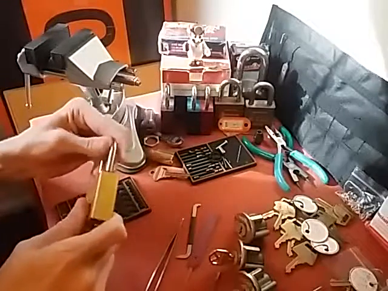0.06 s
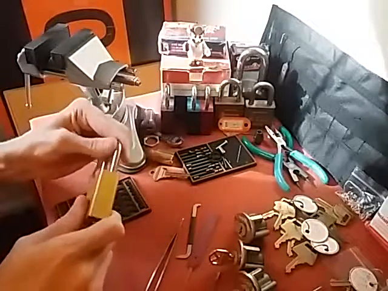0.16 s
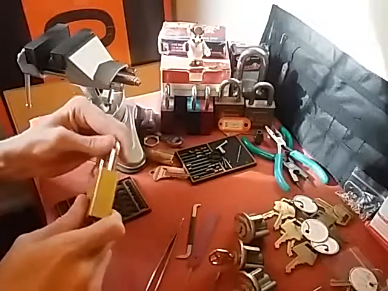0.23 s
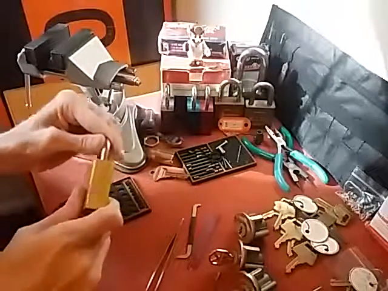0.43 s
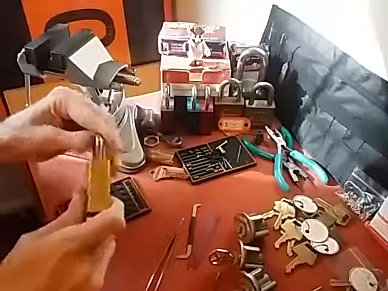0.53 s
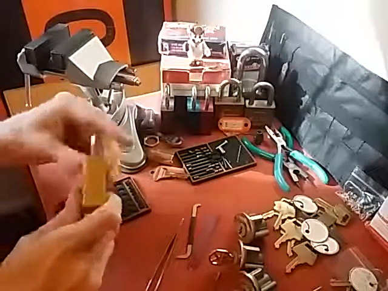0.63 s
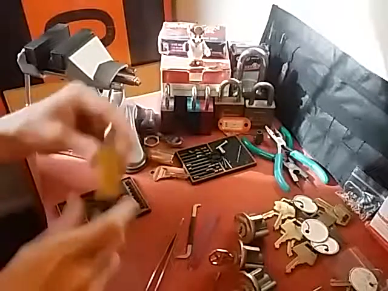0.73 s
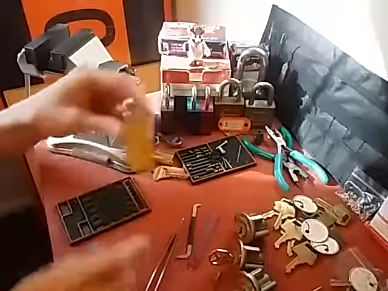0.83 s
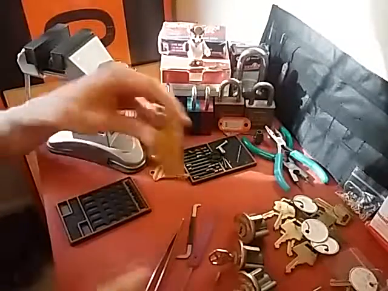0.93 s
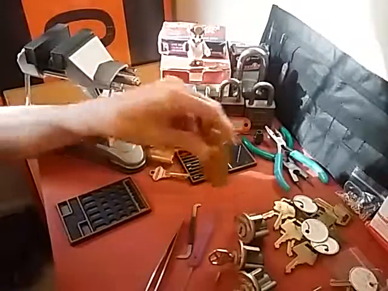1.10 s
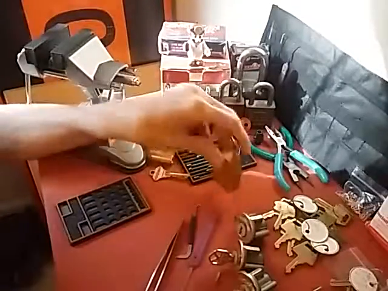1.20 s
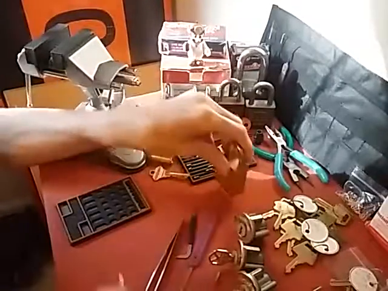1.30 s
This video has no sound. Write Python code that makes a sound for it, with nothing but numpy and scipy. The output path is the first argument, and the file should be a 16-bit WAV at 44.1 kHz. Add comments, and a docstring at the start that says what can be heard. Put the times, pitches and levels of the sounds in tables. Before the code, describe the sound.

A padlock snaps shut with sharp, ringing metal clicks, followed by a few light ticks.

```python
"""A padlock snaps shut

A brass padlock is worked by hand over a workbench in a small room. The latch clicks, the steel shackle
scrapes home and snaps, then clacks as the lock is lifted. Light ticks follow as the fingers shift.
Each click is a sharp crack that sets the metal ringing. The bench and walls echo it, and a noise
suppressor shortens the quiet tails."""
import sys
import numpy as np
from scipy import signal
from scipy.fft import rfft, irfft
from scipy.io import wavfile
from scipy.ndimage import uniform_filter1d

SR = 44100
rng = np.random.default_rng(int(sys.argv[2]) if len(sys.argv) > 2 else 0)


def bounce(signal):
    """Save signal as a 16-bit WAV file at the path given by the first command-line argument."""
    frames = np.transpose(np.atleast_2d(signal))
    limited = np.clip(frames, -1, 1)
    pcm = np.round(limited * 32767).astype(np.int16)
    wavfile.write(sys.argv[1], SR, pcm)


N = 59535

# the room's steady hush: (frequency [Hz], level [dB])
HUSH_COLOUR = [(20, -14.5), (55, -4.5), (150, -2.5), (260, -7.5), (500, -10.5), (1000, -13), (2000, -17),
               (4000, -20), (8000, -26), (15500, -26.5)]
# how alike the noise is in both ears: (frequency [Hz], likeness [0 to 1])
EAR_LIKENESS = [(30, 0.23), (100, 0.1), (500, 0.1), (2000, 0.037)]
# the rise and fall of the hands' rustle: (time [s], level [dB])
RUSTLE_LEVELS = [(0, -96.5), (0.221, -90.5), (.265, -58), (.33, -65), (.42, -67.5), (.54, -60.5),
                 (.63, -85), (0.718, -84), (.77, -62), (.86, -89), (1.06, -80.5), (1.3, -95.5)]
# the rustle's tone: (frequency [Hz], level [dB])
RUSTLE_COLOUR = [(25, -14.5), (60, -5.5), (170, -0.5), (300, -8), (550, -7.5), (900, -13), (3000, -38.5)]
# the time the walls' echo takes to fade by 60 dB: (frequency [Hz], fade [s])
WALL_FADES = [(200, .42), (1200, 0.52), (4500, 0.45), (8000, 0.4), (14000, .41)]
# the tone of that echo: (frequency [Hz], level [dB])
WALL_COLOUR = [(200, -0.5), (800, -3.5), (1500, 3.5), (3000, -1), (5000, -4.5), (8000, 0.5), (14000, 2.5)]
# the lock bumps the hand: (time [s], level [dB])
KNOCK_HITS = [(0.2475, -52.5), (.342, -50), (.3630, -54), (0.749, -56.5), (1.049, -63), (1.141, -63)]
# a bump's dull tone: (frequency [Hz], level [dB])
KNOCK_COLOUR = [(40, -17), (150, -3.5), (260, -4.5), (450, -1), (580, -3), (800, -4.5), (2000, -42.5)]
# the lock shifts in the fingers:
# (time [s], level [dB], treble [dB], chatter fade [s], ping pitch [Hz], ping [dB], left over right [dB])
TICK_HITS = [(0.8625, -57.5, -1.5, .014, 6000, -4, -4), (0.9193, -67, -6, .008, 6900, 2, -5),
             (.9963, -56, 1, 0.0064, 10200, -8.5, -12), (1.0457, -55, -3, .009, 6200, -13.5, -12.5),
             (1.0542, -52, -1.5, .011, 6100, -5, -8.5), (1.063, -48.5, 0, .013, 2950, -6.5, -6.5),
             (1.0686, -47.5, -1.5, .017, 7000, -8.5, -7), (1.0743, -57.5, -4, .025, 2550, -3, -7),
             (1.141, -54.5, 0.5, .025, 11450, -5, -9.5), (1.169, -61.5, -4, .025, 5800, 0, -3.5)]
# a tick's tone: (frequency [Hz], level [dB])
TICK_COLOUR = [(150, -9), (700, -5.5), (1500, -4.5), (2600, 2), (4500, -6.5), (6800, -0.5), (9000, -8.5),
               (11500, -7), (15000, -17)]
# metal hits metal inside the lock: (time [s], level [dB], body [dB], treble [dB], chatter fade [s],
# lock ring [dB], latch ring [dB], left over right [dB])
CLICK_HITS = [(.2446, -46.5, -8.5, -5, 0.0069, -11.5, -20.5, -9.5),
              (.2465, -20.5, -9, -1.5, 0.0076, -13, -5.5, -8.5),
              (0.2491, -24, -10.5, -2.5, 0.003108, -13, -14, -7),
              (0.2605, -33, -7, -10, 0.012, -9.5, -6.5, -5.5),
              (0.3419, -31, -7, -6.5, 0.018, -7, -21.5, -6.5),
              (0.3504, -35, -5, -8.5, 0.010545, -6.5, -21.5, -6),
              (0.3526, -34, -7, 2, .010, -5.5, -22.5, -10), (.3585, -34, -5, -6.5, 0.029, -5.5, -22, -4.5),
              (0.3626, -13, -1, -8, 0.0061, -4.5, -20.5, -9), (.3635, -14.5, 0, 0.5, 0.0087, -2, -21, -5.5),
              (.3660, -20, -2.5, -0.5, .012, -4.5, -22.5, -2),
              (0.3708, -23, 5.5, -4, 0.013666, -2, -22, -4.5),
              (.3810, -30.5, 10, -1.5, 0.012, -8.5, -22, -2), (0.418, -36, -5.5, -6.5, .010, -8, -23, -2.5),
              (.5200, -44.5, 0, -11, .03, -4.5, -20, -11), (.5730, -48, 6.5, -13, 0.011, -9, -22.5, 0),
              (.7330, -54.5, 9.5, -8.5, .010, -3, -31, -8), (0.7478, -36.5, 2, -1.5, .018, -29, -6, -6),
              (0.76, -50, 4, -2.5, .07, -18, -14, -7.5)]
# the tone of a click's crack: (frequency [Hz], level [dB])
CRACK_COLOUR = [(60, -52.5), (200, -43), (330, -32.5), (450, -24.5), (540, -23), (680, -31), (800, -26.5),
                (980, -11.5), (1150, -16.5), (1400, -8.5), (1620, -13), (2350, -7), (3200, -10),
                (4000, -1.5), (5150, 0.5), (5800, -5.5), (6400, -15.5), (7100, -9.5), (8200, -19),
                (9500, -17.5), (12500, -18), (15500, -28.5)]
# the notes that the lock and shackle ring at: (frequency [Hz], level [dB], fade [s])
LOCK_NOTES = [(906.5, -19.5, .1), (1010, -18.5, .04), (1372, -17, .06), (1498, -20, .1), (2347, -15, .13),
              (2780, -14.5, 0.19), (4002, -6, 0.16), (4186, -5.5, 0.063), (4600, -8, 0.13),
              (4700, -4.5, .15), (4874, -4.5, .15), (5040, -1.5, .16), (5100, 0, 0.15), (5380, -0.5, 0.14),
              (5527, -4, .25), (5960, -6.5, 0.26)]
# the notes of the small sprung latch: (frequency [Hz], level [dB], fade [s])
LATCH_NOTES = [(2900, -5, 0.033), (3774, -6, .06), (4960, 1, .15), (6780, 2, .012), (9060, -5, .012),
               (11250, -11.5, .05)]

BODY_HZ, TREBLE_HZ = 1760, 7100  # "body" lies below the first, "treble" above the second


def amp(db):
    """Turn decibels into a gain."""
    return 10 ** (np.asarray(db) / 20)


def along(points, hz):
    """Read between a table's points, on a log frequency scale."""
    freqs, values = np.transpose(points)
    return np.interp(np.log(hz + 1), np.log(freqs + 1), values)


def sides(pan_db):
    """Left and right gains; above 0 dB leans left."""
    return amp(np.array([[pan_db / 2], [-pan_db / 2]]))


def normed(x):
    """Scale each channel to an energy of 1."""
    return x / np.linalg.norm(x, axis=-1, keepdims=True)


def add(track, s, sound):
    """Mix a sound in, s seconds from the start."""
    part = track[:, round(s * SR):][:, :sound.shape[1]]
    part += sound[:, :part.shape[1]]


def causal(gain):
    """A filter with these gains that rings only after the hit, never before."""
    cepstrum = irfft(np.log(np.maximum(gain, 1e-6)))
    half = len(cepstrum) // 2
    cepstrum[1:half] *= 2
    cepstrum[half + 1:] = 0
    return np.exp(rfft(cepstrum))


def noise(colour):
    """Stereo noise of strength 1, partly alike in both ears in the bass."""
    hz = np.fft.rfftfreq(2 * N, 1 / SR)
    turn = np.arccos(np.clip(along(EAR_LIKENESS, hz), -1, 1)) / 2
    spectrum = rfft(rng.standard_normal((2, 2 * N))) * amp(along(colour, hz))
    mid, side = irfft(spectrum * [np.cos(turn), np.sin(turn)])[:, :N]
    pair = np.array([mid + side, mid - side])
    return pair / pair.std()


def room_hush(level_db=-61.5):
    """The room's faint, steady background noise."""
    return amp(level_db) * noise(HUSH_COLOUR)


def hands():
    """Skin and sleeves rustle dully while the lock is pressed and lifted."""
    db = np.interp(np.arange(N) / SR, *np.transpose(RUSTLE_LEVELS))
    return amp(db) * noise(RUSTLE_COLOUR)


def wall_echo(x, level_db=-8.5, delay_s=.006, pan_db=-3):
    """The walls smear the right channel into a tail; each frequency fades at its own speed."""
    hz, t, spectrum = signal.stft(rng.standard_normal((2, SR * 3 // 4)), SR, nperseg=256)
    db = along(WALL_COLOUR, hz)[:, None] - 60 * t / along(WALL_FADES, hz)[:, None]
    tail = normed(signal.istft(spectrum * amp(db), SR, nperseg=256)[1])
    tail = np.pad(tail, ((0, 0), (int(delay_s * SR), 0)))
    return amp(level_db) * sides(pan_db) * signal.fftconvolve(x[1:], tail, axes=1)[:, :N]


def bench_echo(x, level_db=-8, fade_s=.043, delay_s=.0028):
    """Sound bounces quickly off the bench and the things on it."""
    t = np.arange(SR // 8) / SR
    echo = normed(rng.standard_normal((2, len(t))) * amp(-60 * t / fade_s) * (t > delay_s))
    return amp(level_db) * signal.fftconvolve(x, echo, axes=1)[:, :N]


def contact(colour, fade_s, body_db=0, treble_db=0, smooth_hz=900, size=4096):
    """Two things meet: a sharp first touch, then chatter that quickly dies."""
    t, hz = np.arange(size) / SR, np.fft.rfftfreq(size, 1 / SR)
    burst = rng.standard_normal((2, size)) * amp(-60 * t / fade_s)
    burst[:, 0] = 2.0308  # the first touch
    spectrum = rfft(burst)
    # even out chance peaks before shaping the tone
    power = uniform_filter1d(np.abs(spectrum) ** 2, int(smooth_hz / hz[1]))
    spectrum *= [causal(np.abs(channel) ** -.5) for channel in power]
    body = body_db / (1 + (hz / BODY_HZ) ** 4)
    treble = treble_db * (1 - 1 / (1 + (hz / TREBLE_HZ) ** 6))
    return normed(irfft(spectrum * causal(amp(along(colour, hz) + body + treble))))


def ring(notes, body_db=0, scatter_db=-.5, drift=.035):
    """Struck metal rings a little differently each time; loose parts make its notes waver."""
    t = np.arange(SR // 2) / SR
    hz, db, fade_s = np.transpose(notes)[:, :, None]
    db = db + body_db * (hz < BODY_HZ) + scatter_db * rng.standard_normal(hz.shape)
    wander = np.cumsum(drift * rng.standard_normal((len(hz), len(t))), axis=1) * np.sqrt(hz / BODY_HZ)
    ear_shift = np.array([0, np.pi / 2])[:, None, None]
    phase = rng.uniform(0, 2 * np.pi, hz.shape) + wander + ear_shift
    waves = amp(db - 60 * t / fade_s) * np.sin(2 * np.pi * hz * t + phase)
    return normed(waves.sum(1))


def padlock(ring_trim_db=-6.5, ping_fade_s=.012, knock_fade_s=.075):
    """Clicks set the lock and latch ringing, light ticks ping, and the lock knocks against the hand."""
    out = np.zeros((2, N))
    for s, db, body_db, treble_db, fade_s, ring_db, latch_db, pan_db in CLICK_HITS:
        gain = amp(db) * sides(pan_db)
        lock = amp(ring_trim_db + ring_db) * ring(LOCK_NOTES, body_db)
        latch = amp(latch_db) * ring(LATCH_NOTES)
        add(out, s, gain * contact(CRACK_COLOUR, fade_s, body_db, treble_db))
        add(out, s, gain * (lock + latch))
    for s, db, treble_db, fade_s, ping_hz, ping_db, pan_db in TICK_HITS:
        gain = amp(db) * sides(pan_db)
        add(out, s, gain * contact(TICK_COLOUR, fade_s, treble_db=treble_db))
        add(out, s, gain * amp(ping_db) * ring([(ping_hz, 0, ping_fade_s)]))
    for s, db in KNOCK_HITS:
        add(out, s, amp(db) * contact(KNOCK_COLOUR, knock_fade_s)[:1])  # same in both ears
    return np.sqrt(SR * .002) * out  # levels count a hit's energy as if packed into 2 ms


def scene():
    """The lock, its echoes, the hands and the room's hush."""
    lock = padlock()
    return lock + bench_echo(lock) + wall_echo(lock) + hands() + room_hush()


def suppress_noise(x, threshold_db=11, depth_db=9.5, softness_db=4.5):
    """Turn each frequency band down while it stays near its own quiet level."""
    spectrum = signal.stft(x, nperseg=256)[2]
    power = (np.abs(spectrum) ** 2).mean(0)
    power = uniform_filter1d(power, size=25, axis=0)  # smooth over frequency
    power = uniform_filter1d(power, size=3, axis=1)  # and over time
    db = 10 * np.log10(np.abs(power) + 1e-20)
    above_quiet = db - np.percentile(db, 20, axis=1, keepdims=True)
    shut = (1 - np.tanh((above_quiet - threshold_db) / (2 * softness_db))) / 2
    return signal.istft(spectrum * amp(-depth_db * shut), nperseg=256)[1][:, :N]


def record(dry):
    """Turn down the quiet parts, round off loud peaks and cut the highest treble."""
    peak_limit, top_hz = .9, 16000
    x = suppress_noise(dry)
    x = x / (1 + (x / peak_limit) ** 8) ** (1 / 8)
    hz = np.fft.rfftfreq(2 * N, 1 / SR)
    return irfft(rfft(x, 2 * N) * (hz < top_hz))[:, :N]


dry = scene()
out = record(dry)
bounce(out)
```